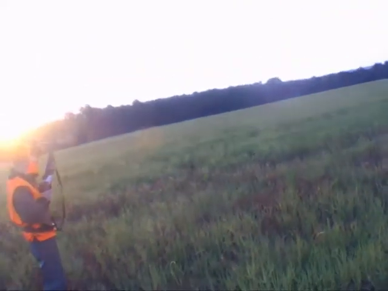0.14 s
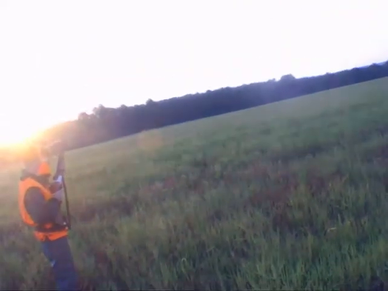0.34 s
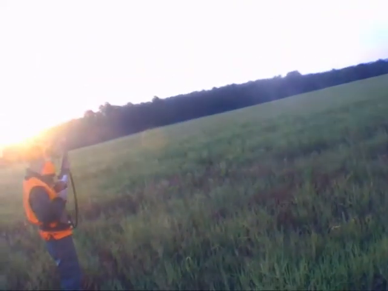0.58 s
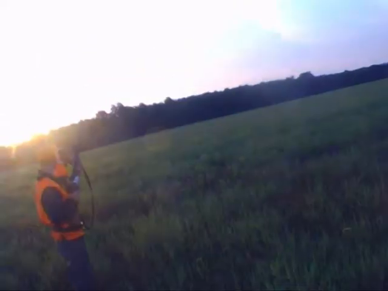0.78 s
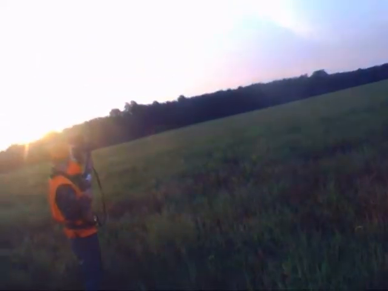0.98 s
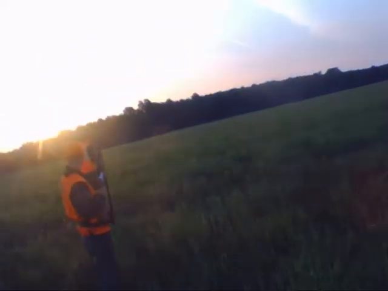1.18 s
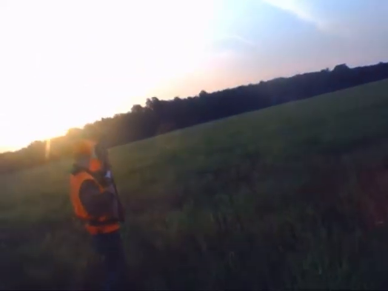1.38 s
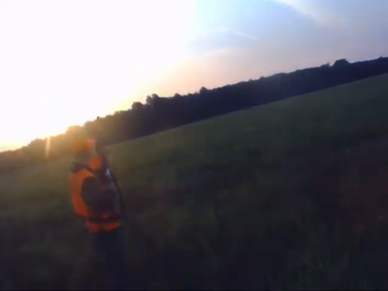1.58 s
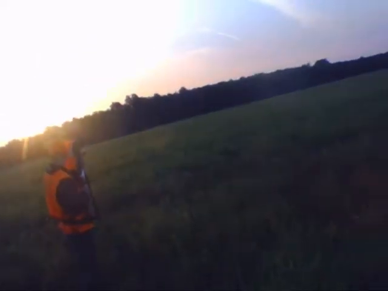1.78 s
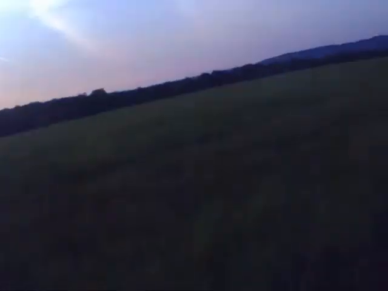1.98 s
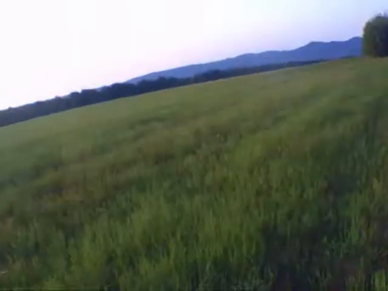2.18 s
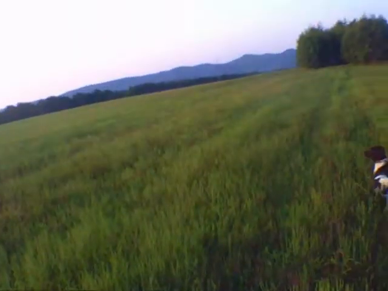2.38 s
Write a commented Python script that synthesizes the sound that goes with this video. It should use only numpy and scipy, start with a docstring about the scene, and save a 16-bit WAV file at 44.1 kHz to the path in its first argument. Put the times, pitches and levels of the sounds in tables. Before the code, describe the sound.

A single close gunshot cracks across an open grass field, with grainy echoes rolling off distant trees

```python
"""Gunshot in an open grass field

One shot close by: a relaxing pressure step with a crack and a low thump overloads the recorder.
Noise makes the short roar of near scatter; clicks rung through short resonances make grainy tree-line echoes,
with single slaps and swishes of hiss on top. Two dull bumps, a faint falling bird whistle and steady hiss fill in.
A small camera sampling at 16 kHz leaves a weak mirror image of the treble above 8 kHz."""
import sys
import numpy as np
from scipy import signal
from scipy.fft import rfft, irfft
from scipy.io import wavfile

SR = 44100
rng = np.random.default_rng(int(sys.argv[2]) if len(sys.argv) > 2 else 0)


def pcm_store(signal):
    """Save signal as 16-bit PCM."""
    levels = np.round(np.clip(np.atleast_2d(signal), -1, 1) * 32767)
    wavfile.write(sys.argv[1], SR, levels.astype(np.int16).T)


def volts_from_db(level):
    """Convert decibel levels to linear amplitude ratios."""
    exponent = np.asarray(level, float) / 20
    return 10 ** exponent


N = 108045
T = np.arange(N) / SR  # time, s

# Steady field and microphone hiss, relative spectrum: pitch_hz, level_db (per Hz)
AIR_SPECTRUM = [(25, -16.5), (70, -6), (153, -5), (451, -5), (1850, -10), (2450, -16.5), (3830, -19.5),
                (6900, -24.5), (8970, -48.5)]
AIR_DB = -68.5

# Near scatter, relative spectrum: pitch_hz, level_db (per Hz)
ROAR_SPECTRUM = [(35, -18.5), (60, -18), (388, -5.5), (637, -16), (911, -7), (1590, -6), (2710, -14.5),
                 (4920, -17), (6900, -12), (8970, -40)]
# How each band of the roar dies: pitch_hz, hold_s, t60_s
ROAR_DECAY = [(60.4, 0.015, 0.077), (121.6, 0.018, 0.149), (257.5, 0.036, 0.19), (500, 0.025, 0.19),
              (1200, 0.057, 0.22), (2080, 0.02, 0.18), (3500, 0.005, 0.28), (6070, 0.0067, 0.19)]
ROAR_DB, ROAR_ATTACK_S = -15, 0.0155
ROAR_GRAIN_DB, ROAR_GRAIN_HZ = 2, 153  # the scatter arrives in clumps
FORERUNNER_S, FORERUNNER_DB = 0.198, -30  # faint sound just ahead of the blast

# Slow low tail, relative spectrum: pitch_hz, level_db (per Hz)
RUMBLE_SPECTRUM = [(40, -39), (123, -2.5), (495, -5.5), (780, -25), (1000, -52)]
RUMBLE_DB, RUMBLE_T60_S = -38, 0.95

SHOT_S, BLAST_DB, BLAST_MS = 0.2021, -13, 2.2
CRACK_DELAY_MS, CRACK_DB, CRACK_MS = 0.55, -10, 0.1
THUMP_DB, THUMP_HZ, THUMP_T60_S = -20, 35, 0.024

# Breakpoints of the trunk echoes: time_s, level_db, deep_share (0-1), air_dulled_share (0-1)
TRUNK_ECHO = [(0.32, -43.5, 0.9, 0.5), (0.381, -40.5, 0.4, 0.4), (0.42, -47, 0, 0.7),
              (0.452, -42.5, 0.87, 1), (0.6, -62, 1, 0.4), (0.626, -44, 0.05, 0), (0.684, -51, 0, 0),
              (0.715, -69, 0, 0), (0.748, -47.5, 0.03, 0), (0.872, -42.5, 0.26, 0.7),
              (0.882, -56, 0.3, 0.1), (0.893, -45, 0.18, 0.8), (1.02, -57.5, 0.17, 0.24),
              (1.11, -49.5, 0.9, 0.1), (1.18, -50, 0.7, 0.16), (1.32, -51, 0.75, 0.87),
              (1.43, -51.5, 0.94, 0), (1.48, -48.5, 1, 0), (1.51, -44, 0.82, 0.45),
              (1.68, -45.5, 0.42, 0.38), (1.86, -49, 0.71, 0.26), (1.93, -55.5, 0.83, 0.3),
              (2.35, -54, 0.93, 1), (2.45, -61.5, 1, 1)]
# Thinner echo colour, relative spectrum: pitch_hz, level_db (per Hz)
THIN_ECHO = [(200, -48), (400, -31.5), (560, -15), (740, -3), (1000, -1), (1300, -6.5), (1650, -8.5),
             (2100, -11), (2500, -20), (2900, -18), (3300, -30.5), (6000, -67.5)]
# Deeper echo colour, relative spectrum: pitch_hz, level_db (per Hz)
DEEP_ECHO = [(88, -42.5), (150, -28), (294, -26), (432, -5), (802, -1), (1190, -1.5), (1620, -6.5),
             (1960, -13.5), (2760, -16), (3350, -43), (4000, -25.5), (5200, -55.5)]
# Treble lost in the air: pitch_hz, gain_db
AIR_DULLING = [(1700, -1), (2100, -12), (4000, -10.5)]
# Breakpoints of the echoes from the leaves: time_s, level_db
FOLIAGE_ECHO = [(0.32, -50), (0.352, -56.5), (0.436, -60.5), (0.446, -55), (0.586, -69), (0.618, -60),
                (0.722, -70.5), (0.744, -63), (0.802, -70.5), (1.034, -76.5), (1.054, -59.5),
                (1.212, -70.5), (1.226, -63.5), (1.254, -69), (1.34, -70.5), (1.428, -71.5), (1.582, -74),
                (2.0, -79)]
# Foliage hiss, relative spectrum: pitch_hz, level_db (per Hz)
FOLIAGE_SPECTRUM = [(1180, -39.5), (2210, -4.5), (3260, -10), (3900, -7.5), (4730, -13.5), (6900, -14),
                    (8970, -47)]
TRUNKS_PER_S = 550  # at time zero; the rate grows by as much again every second
TRUNK_SPREAD_DB, TRUNK_TOP_DB, DIFFUSE_DB = 8, 9, -4
# Each return leans to a pitch of its own
TRUNK_LOW_HZ, TRUNK_HIGH_HZ, TRUNK_RING_DB, TRUNK_CYCLES = 580, 1886, -9.5, 6.0

# Dull bumps: centre_s, level_db (peak), pitch_hz
BUMPS = [(0.312, -29, 213), (0.396, -34, 260)]
BUMP_WIDTH_S = 0.0021

# Single strong returns: start_s, level_db (envelope peak before the bass cut), pitch_hz
SLAPS = [(0.445, -39, 1130), (0.624, -38, 1070), (0.632, -37, 1420), (0.637, -33.5, 1100),
         (0.642, -35.5, 1310), (0.651, -39, 1200), (0.746, -35, 1010), (0.770, -35.5, 1110),
         (0.777, -31.5, 910), (1.081, -36, 1260), (1.1, -37.5, 1450), (1.111, -35.5, 756),
         (1.119, -35.5, 1200), (1.289, -47, 980), (1.306, -38, 790), (1.451, -34, 770), (1.498, -35, 735),
         (2.208, -42.5, 897)]
SLAP_CYCLES, SLAP_LOW_HZ = 0.76, 403  # cycles to the envelope peak; thin trunks return no bass

# Narrow bright patches at the front of some echoes: start_s, t60_s, level_db (before the fade), pitch_hz
SWISHES = [(.615, 0.24, -57, 2770), (.735, 0.32, -65, 5420), (.735, 0.69, -58.5, 2890),
           (1.05, 0.6, -66.5, 6620), (1.42, 0.43, -68, 4080)]
SWISH_WIDTH_HZ, SWISH_ATTACK_S = 310, 0.0066

BIRD_S, BIRD_LENGTH_S, BIRD_DB = 2.16, 0.088, -79.5
BIRD_START_HZ, BIRD_END_HZ, BIRD_BLUR_HZ = 6670, 6300, 149

# Filter on the mirrored treble, ahead of MIRROR_DB: pitch_hz, gain_db
MIRROR_SHAPE = [(7500, -36), (8800, 2), (9400, 1.5), (10200, -9), (11500, -26), (13000, -55)]
MIRROR_DB, SAMPLING_HZ = -11, 16000
MIC_LOW_HZ, BAND_TOP_HZ, HISS_DB = 3.9, 7750, -101.5
OVERLOAD, OVERLOAD_KNEE = 0.29, 4  # limit in full-scale units, hardness of the bend
CEILING, CEILING_KNEE = 0.31, 8


def rms_one(x):
    """Scale to rms 1."""
    return x / np.sqrt(np.mean(x ** 2) + 1e-20)


def white_noise():
    """Fresh white noise over the whole scene."""
    return rng.standard_normal(N)


def low_pass(x, hz):
    """Second-order Butterworth low-pass."""
    return signal.sosfilt(signal.butter(2, hz, fs=SR, output="sos"), x)


def high_pass(x, hz, order):
    """Butterworth bass cut."""
    return signal.sosfilt(signal.butter(order, hz, "high", fs=SR, output="sos"), x)


def on_log(points, hz, column=1):
    """Read a table along log frequency."""
    p = np.array(points)
    return np.interp(np.log(np.maximum(hz, 1)), np.log(p[:, 0]), p[:, column])


def shape(x, spectrum):
    """Causal minimum-phase filter with the given gains, built by folding the cepstrum."""
    size = 8192
    gains = volts_from_db(on_log(spectrum, np.arange(size // 2 + 1) * SR / size))
    cepstrum = irfft(np.log(gains))
    cepstrum[1:size // 2] *= 2
    cepstrum[size // 2 + 1:] = 0
    impulse = irfft(np.exp(rfft(cepstrum)))
    return signal.fftconvolve(x, impulse)[:N]


def colour(x, spectrum):
    """Shape and scale to rms 1."""
    return rms_one(shape(x, spectrum))


def resonate(x, hz, width_hz):
    """Two-pole resonance, gain 1 on top."""
    r = np.exp(-np.pi * width_hz / SR)
    zeros = np.array([1, 0, -1]) * (1 - r * r) / 2
    poles = [1, -2 * r * np.cos(2 * np.pi * hz / SR), r * r]
    return signal.lfilter(zeros, poles, x + 1e-18)


def ring(s, db, hz, t60):
    """A damped sine from time s."""
    t = np.maximum(T - s, 0)
    return volts_from_db(db - 60 * t / t60) * np.sin(2 * np.pi * hz * t)


def squash(x, top, knee):
    """Rounded clipping."""
    return x / (1 + np.abs(x / top) ** knee) ** (1 / knee)


def air():
    """Steady background hiss: coloured noise."""
    return volts_from_db(AIR_DB) * colour(white_noise(), AIR_SPECTRUM)


def roar():
    """Dense near scatter as clumped noise: a faint forerunner, a swell, a hold, then a fall band by band."""
    size = SR  # the roar is worked out over the first second
    t = T[:size] - SHOT_S
    swell = np.clip(t / ROAR_ATTACK_S, 0, 1) ** 0.99
    forerunner = volts_from_db(FORERUNNER_DB - ROAR_DB) * (T[:size] > FORERUNNER_S)
    clumps = rms_one(low_pass(white_noise(), ROAR_GRAIN_HZ))
    grainy = colour(volts_from_db(ROAR_GRAIN_DB * clumps) * white_noise(), ROAR_SPECTRUM)
    noise = grainy[:size] * volts_from_db(ROAR_DB) * (swell + forerunner)
    out, below = np.zeros(N), 0
    for hz in 45 * 2 ** np.arange(0, 8, .5):  # half-octave bands
        low = low_pass(noise, hz * 2 ** .25)
        hold_s, t60_s = on_log(ROAR_DECAY, hz), on_log(ROAR_DECAY, hz, column=2)
        fall = np.maximum(t - hold_s, 0) / t60_s
        out[:size] += (low - below) * volts_from_db(-60 * fall)
        below = low
    return out


def blast():
    """An inverted pressure step that relaxes, a thin crack just behind its front, a low thump under it."""
    t_ms = np.maximum(T - SHOT_S, 0) * 1000
    front = np.minimum(t_ms / .2, 1)
    relaxing = (1 - t_ms / (2 * BLAST_MS)) * np.exp(-t_ms / BLAST_MS)
    step = -volts_from_db(BLAST_DB) * front * relaxing
    crack = volts_from_db(CRACK_DB) * np.exp(-.5 * ((t_ms - CRACK_DELAY_MS) / CRACK_MS) ** 2)
    return step + crack - ring(SHOT_S, THUMP_DB, THUMP_HZ, THUMP_T60_S)


def rumble():
    """Low noise that swells with the roar and fades slowly below it."""
    t = np.maximum(T - SHOT_S, 0)
    envelope = np.clip(t / ROAR_ATTACK_S, 0, 1) * volts_from_db(RUMBLE_DB - 60 * t / RUMBLE_T60_S)
    return envelope * colour(white_noise(), RUMBLE_SPECTRUM)


def trunk_returns():
    """Random clicks, denser from farther woods, each dealt to one of ten short resonances, over a diffuse bed."""
    sizes_db = np.minimum(TRUNK_SPREAD_DB * rng.exponential(1, N), TRUNK_TOP_DB)
    sizes = volts_from_db(sizes_db) * rng.choice([-1, 1], N)
    hits = rng.random(N) < TRUNKS_PER_S * (1 + T) / SR
    clicks = rms_one(sizes * hits)
    dealt = rng.integers(0, 10, N)
    pitches = np.geomspace(TRUNK_LOW_HZ, TRUNK_HIGH_HZ, 10)
    rings = sum(resonate(clicks * (dealt == k), hz, hz / TRUNK_CYCLES) for k, hz in enumerate(pitches))
    rung = volts_from_db(TRUNK_RING_DB) * np.sqrt(TRUNK_CYCLES) * rings
    return clicks + rung + volts_from_db(DIFFUSE_DB) * white_noise()


def echoes():
    """Trunks return small clicks, blended thin to deep and dulled by air; foliage returns a smoother hiss."""
    s, *columns = np.transpose(TRUNK_ECHO)
    level_db, deep, dull = (np.interp(T, s, c) for c in columns)
    deep, dull = np.clip(deep, 0, 1), np.clip(dull, 0, 1)
    returns = trunk_returns()
    body = (1 - deep) * colour(returns, THIN_ECHO) + deep * colour(returns, DEEP_ECHO)
    body = (1 - dull) * body + dull * shape(body, AIR_DULLING)
    leaves = colour(white_noise(), FOLIAGE_SPECTRUM)
    leaves_db = np.interp(T, *np.transpose(FOLIAGE_ECHO))
    both = volts_from_db(level_db) * body + volts_from_db(leaves_db) * leaves
    return (T > SHOT_S + ROAR_ATTACK_S) * both


def bumps():
    """Short dull knocks, a cycle or two under a smooth swell."""
    out = 0
    for s, db, hz in BUMPS:
        swell = np.exp(-.5 * ((T - s) / BUMP_WIDTH_S) ** 2)
        out = out + volts_from_db(db) * swell * np.cos(2 * np.pi * hz * (T - s))
    return out


def slaps():
    """Single strong returns: a few cycles at a pitch of their own that swell and die."""
    out = 0
    for s, db, hz in SLAPS:
        cycles = np.maximum(T - s, 0) * hz
        swell = cycles / SLAP_CYCLES * np.exp(1 - cycles / SLAP_CYCLES)
        out = out + volts_from_db(db) * swell * np.sin(2 * np.pi * cycles)
    return high_pass(out, SLAP_LOW_HZ, 2)


def swishes():
    """Narrow bands of hiss that swell quickly and fade."""
    out, white = 0, white_noise()
    for s, t60, db, hz in SWISHES:
        t = np.maximum(T - s, 0)
        once = resonate(white, hz, SWISH_WIDTH_HZ)
        band = rms_one(resonate(once, hz, SWISH_WIDTH_HZ))
        out = out + band * np.minimum(t / SWISH_ATTACK_S, 1) * volts_from_db(db - 60 * t / t60)
    return out


def bird():
    """A faint falling whistle, its level roughened by slow noise."""
    u = np.clip((T - BIRD_S) / BIRD_LENGTH_S, 0, 1)  # progress through the call
    hz = BIRD_START_HZ + (BIRD_END_HZ - BIRD_START_HZ) * u ** 2
    rough = rms_one(low_pass(white_noise(), BIRD_BLUR_HZ))
    envelope = np.sin(np.pi * u) ** .5 * (1 + rough)
    return volts_from_db(BIRD_DB) * envelope * np.sin(2 * np.pi * np.cumsum(hz) / SR)


def scene():
    """All sources, one channel."""
    shot = roar() + blast() + rumble()
    returns = echoes() + slaps() + swishes()
    return (air() + shot + returns + bumps() + bird())[None]


def mirror_image(x):
    """Treble folded around half the camera's sampling rate by a carrier at that rate, then filtered."""
    folded = x[0] * 2 * np.cos(2 * np.pi * SAMPLING_HZ * T)
    return volts_from_db(MIRROR_DB) * shape(folded, MIRROR_SHAPE)


def top_cut(x):
    """Nothing passes above the cut-off."""
    return signal.sosfilt(signal.butter(12, 11800, fs=SR, output="sos"), x)


def record(dry):
    """The camera: bass cut, overload, steep band limit, mirror image, a last ceiling and hiss."""
    x = high_pass(dry, MIC_LOW_HZ, 1)
    overloaded = squash(x, OVERLOAD, OVERLOAD_KNEE)
    limited = signal.sosfilt(signal.cheby2(10, 50, BAND_TOP_HZ, fs=SR, output="sos"), overloaded)
    capped = squash(limited + mirror_image(limited), CEILING, CEILING_KNEE)
    mix = capped + volts_from_db(HISS_DB) * rng.standard_normal(capped.shape)
    return top_cut(mix)


dry = scene()
out = record(dry)
pcm_store(out)
```